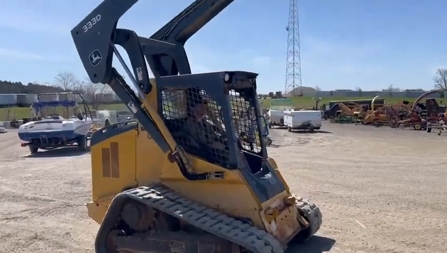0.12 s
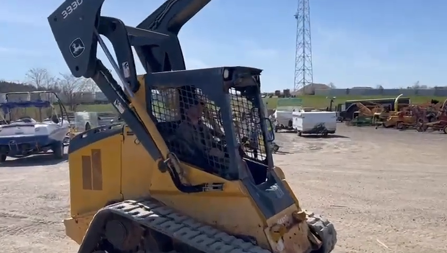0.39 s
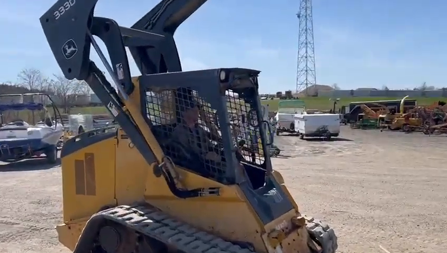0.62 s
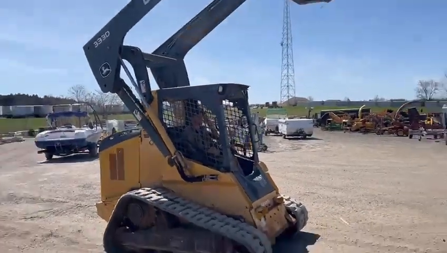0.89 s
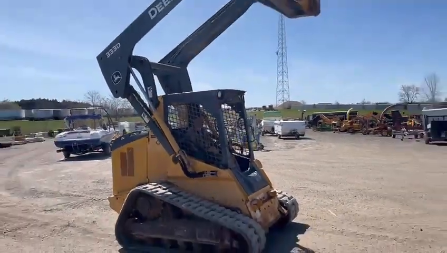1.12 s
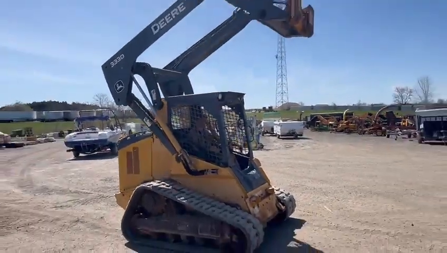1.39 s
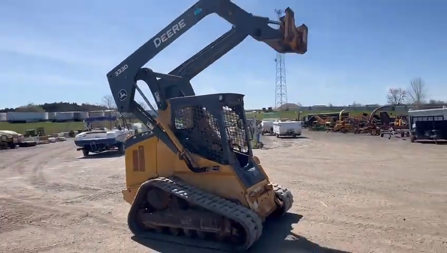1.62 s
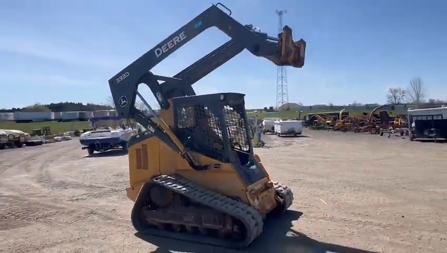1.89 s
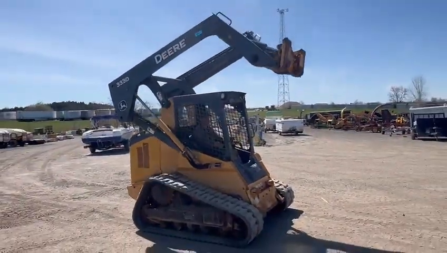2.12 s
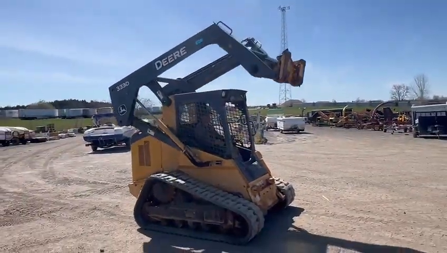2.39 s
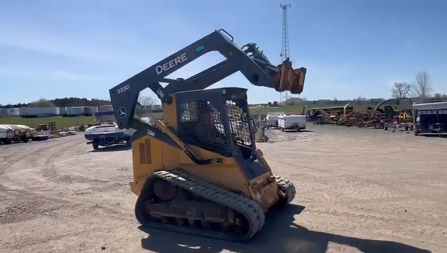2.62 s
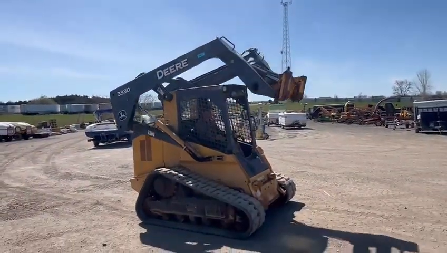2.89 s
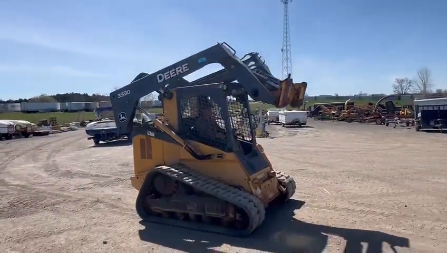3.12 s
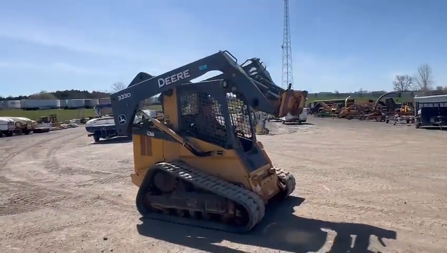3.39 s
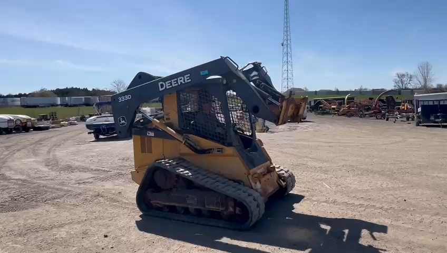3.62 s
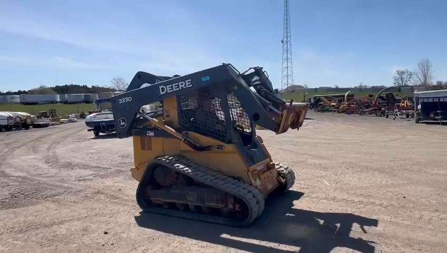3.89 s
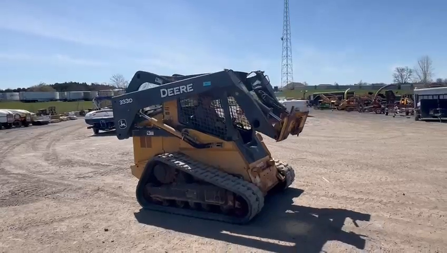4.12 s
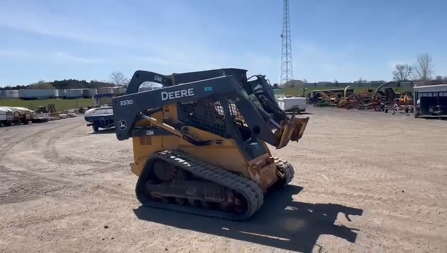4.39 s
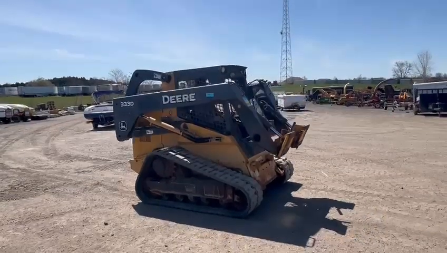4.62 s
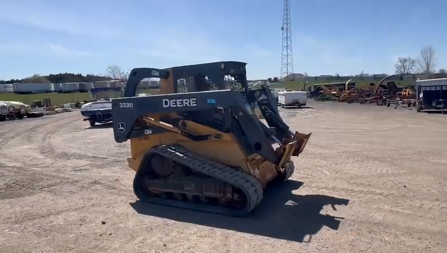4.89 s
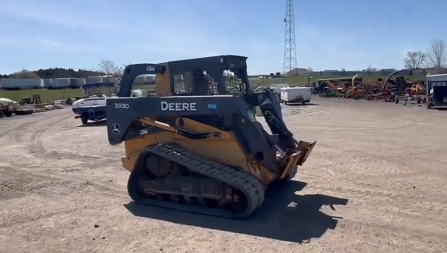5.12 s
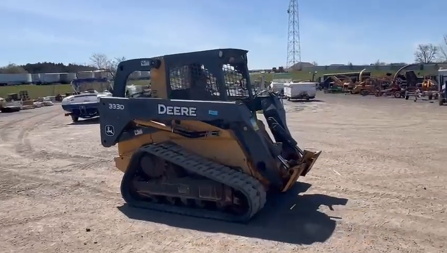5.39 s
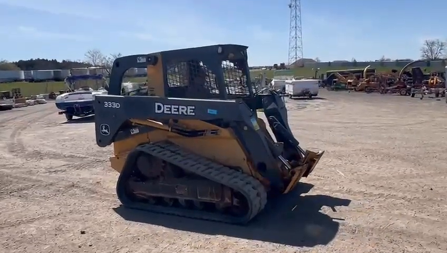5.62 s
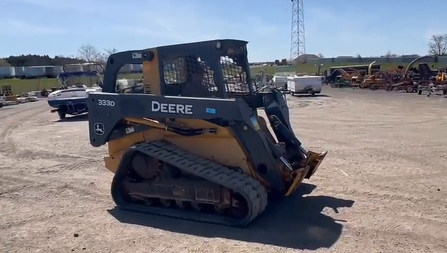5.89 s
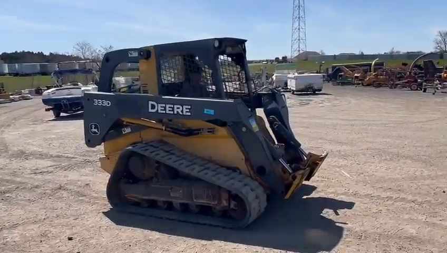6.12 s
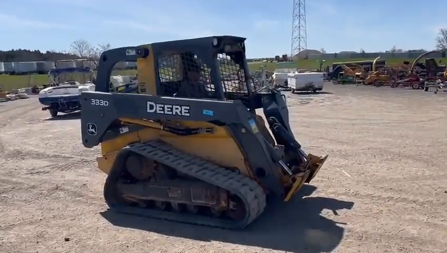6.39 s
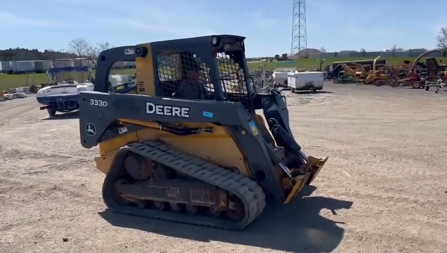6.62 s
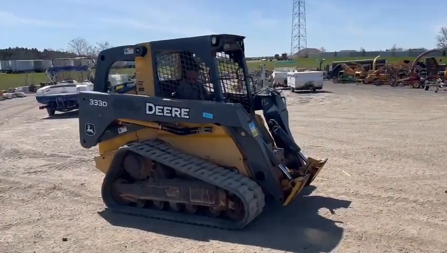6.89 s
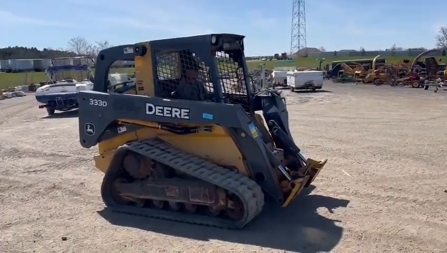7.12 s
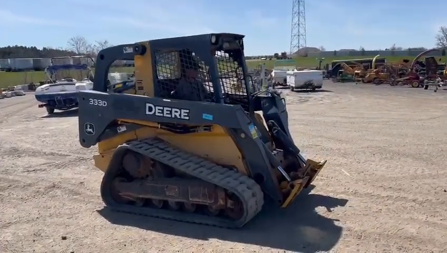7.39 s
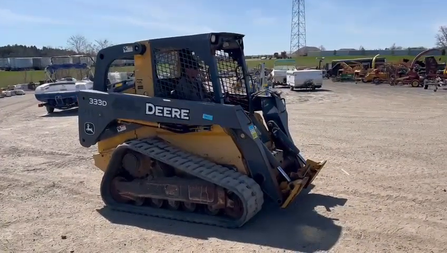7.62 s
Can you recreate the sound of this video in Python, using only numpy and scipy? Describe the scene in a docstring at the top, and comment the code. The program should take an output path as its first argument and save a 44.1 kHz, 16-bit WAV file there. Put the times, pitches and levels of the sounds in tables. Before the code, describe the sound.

Steady low diesel chugging in an open gravel yard, two early bursts of clanking steel, whining hydraulics, and hard wind thumps near the end.

```python
"""Diesel loader lowering its boom

A five-cylinder diesel loader idles in an open gravel yard: five unequal puffs a cycle throb through
exhaust resonances over knocking block modes and filtered-noise roar. The pump and gears whine as sines
on multiples of engine speed, joined by freer whines. Linkage blows clank twice and rattle, ringing
steel modes. Noise gusts and pressure pops buffet two microphones, briefly midway, hard near the end.
"""
import sys
import numpy as np
from scipy import signal
from scipy.fft import rfft, irfft
from scipy.io import wavfile

SR = 44100
rng = np.random.default_rng(int(sys.argv[2]) if len(sys.argv) > 2 else 0)


def transcribe(signal):
    """Save signal, clipped to [-1, 1], as a 16-bit WAV file at the path in sys.argv[1]."""
    frames = np.atleast_2d(signal).T
    limited = np.clip(frames, -1, 1)
    pcm = np.round(limited * 32767).astype(np.int16)
    wavfile.write(sys.argv[1], SR, pcm)


def boost(x):
    """Linear amplitude factor 10**(x/20) for a level x in decibels (scalar or array-like)."""
    u = np.asarray(x, float) / 20
    return 10 ** u


N = 341775
OPPOSITE = np.array([[1], [-1]])   # signs at left and right


def seconds():
    """Time of every sample."""
    return np.arange(N) / SR


def in_time(rows):
    """Columns of a table as straight-line curves, one value a sample."""
    s, *columns = np.transpose(rows)
    return [np.interp(seconds(), s, c) for c in columns]


def glide(x, time_s):
    """One-pole smoothing, started at the first value."""
    r = np.exp(-1 / (time_s * SR))
    return x[0] + signal.lfilter([1 - r], [1, -r], x - x[0])


def stages(rows):
    """Each row holds until the next, with a short glide between them."""
    s, *columns = np.transpose(rows)
    now = np.clip(np.searchsorted(s, seconds()) - 1, 0, None)
    return [glide(c[now], time_s=0.025) for c in columns]


def at_hz(points, hz):
    """A spectrum table read on a log-frequency axis."""
    at, value = np.transpose(points)
    return np.interp(np.log(hz + 1), np.log(at + 1), value)


def rms_one(x):
    """Scales to rms 1."""
    return x / np.sqrt(np.mean(x ** 2) + 1e-20)


def drift(rate_hz, count=1):
    """Slow chance of rms 1: noise through two equal poles, run at every 40th sample."""
    r = np.exp(-80 * np.pi * rate_hz / SR)
    noise = rng.standard_normal((count, N // 40 + 3002))
    slow = signal.lfilter([1], [1, -2 * r, r * r], noise)[:, 3000:]
    return np.array([np.interp(np.arange(N) / 40, np.arange(len(v)), rms_one(v)) for v in slow])


def cut(x, hz, kind, order=2):
    """Butterworth filter."""
    return signal.sosfilt(signal.butter(order, hz, kind, fs=SR, output="sos"), x)


def ring(clicks, hz, t60):
    """A unit click sets a sine of height 1 ringing, down 60 dB after t60 seconds."""
    r, w = boost(-60 / (t60 * SR)), 2 * np.pi * hz / SR
    return signal.lfilter([0, np.sin(w)], [1, -2 * r * np.cos(w), r * r], clicks + 1e-18)


def ring_all(modes, force):
    """One force sets a whole table of modes ringing."""
    return sum(boost(db) * ring(force, hz, t60) for hz, db, t60 in modes)


def swell(clicks, rise_s, fall_s):
    """An envelope of about the clicks' height that rises fast and dies away."""
    up, down = np.exp(-1 / (rise_s * SR)), np.exp(-1 / (fall_s * SR))
    dying = signal.lfilter([1], [1, -down], clicks + 1e-18)
    return signal.lfilter([1 - up], [1, -up], dying)


def struck(modes, force, open_db):
    """A gritty force drives the modes; many small unresolved modes between them pass as noise."""
    grit = rng.standard_normal((2, N))
    edges = [modes[0][0] * .75, min(modes[-1][0] * 1.15, 12000)]
    # a steady unit force would give the resolved modes rms 1
    resolved = ring_all(modes, force * grit[0]) / np.std(ring_all(modes, grit[0]))
    unresolved = cut(force * grit[1], edges, "band") / np.std(cut(grit[1], edges, "band"))
    return resolved + boost(open_db) * unresolved


def knocking(cycle, places):
    """One click for every place in every cycle, a little uneven."""
    clicks = np.zeros(N)
    for place, db in places:
        clicks[1:] += boost(db) * np.diff(np.floor(cycle - place))
    return clicks * boost(.8 * drift(20.0)[0])


def tone(turns, db, waver_db, wander_db=0):
    """A sine of wavering level, fast and slow."""
    level_db = db + waver_db * drift(29.5)[0] + wander_db * drift(0.53)[0]
    return np.sqrt(2) * boost(level_db) * np.sin(2 * np.pi * turns + rng.uniform(0, 2 * np.pi))


def spread(x, lag_s, side_db, low_side_db):
    """An echo off the ground reaches the two sides with opposite sign, more in the treble."""
    late = boost(side_db) * cut(x, 480, "high") + boost(low_side_db) * x
    return x + np.roll(late, round(lag_s * SR)) * OPPOSITE


# Gusts on the microphones. Each row: centre in seconds, width (spread) in seconds, level in dB.
GUSTS = [(3.66, 0.1, -33), (6.55, 0.32, -31), (6.742, 0.067, -28), (6.979, 0.02, -24), (7.1, 0.066, -27)]


def blowing(widen):
    """Each gust is a bell-shaped swell of level, stretched by a factor."""
    t = seconds()
    return sum(boost(db) * np.exp(-.5 * ((t - s) / (widen * width_s)) ** 2) for s, width_s, db in GUSTS)


# Wind pops on the microphones. Each row: centre in seconds, peak in dB, pitch in Hz.
POPS = [(3.585, -16, 258), (3.6865, -9.5, 165), (3.698, -10, 120), (6.269, -12.5, 200), (6.382, -8.5, 138),
        (6.391, -6.5, 142), (6.400, -8.5, 145), (6.4576, -10.5, 230), (6.4664, -8.5, 165),
        (6.557, -12.5, 158), (6.596, -9.5, 280), (6.641, -10, 204), (6.6935, -15, 243), (6.707, -9, 298),
        (6.7206, -8.5, 330), (6.7225, -20.5, 620), (6.731, -12, 148), (6.758, -14, 197),
        (6.762, -14.5, 520), (6.769, -2, 157), (6.802, -12, 230), (6.8215, -0.5, 255), (6.957, -10, 335),
        (6.965, -1.5, 389), (6.9741, -11.5, 750), (6.976, -22, 1500), (6.977, -1.5, 186),
        (6.989, -5.5, 282), (7.004, -15, 590), (7.007, -10, 242), (7.018, -9, 159), (7.074, -14.5, 380),
        (7.081, -6, 165), (7.094, -11, 292), (7.106, -7, 344), (7.109, -22, 690), (7.120, -8.5, 300)]


def pops():
    """Each pop is a short lump of pressure that swings once or twice at its own pitch."""
    out = np.zeros(N)
    spread_swings = .39
    half = SR // 50
    since = np.arange(-half, half) / SR
    for s, db, hz in POPS:
        at = round(s * SR) - half
        lump = np.exp(-.5 * (since * hz / spread_swings) ** 2)
        out[at:at + len(since)] -= boost(db) * lump * np.cos(2 * np.pi * hz * since)
    return out


def wind():
    """Low rumble, lumpy buffeting noise and short brighter pops, partly each side's own."""
    # the rumble has opposite sign at the two ports and swells more widely around each gust
    breeze = boost(-44 + 7.0 * drift(3.0)[0]) + boost(-5) * blowing(widen=2.5)
    rumble = rms_one(cut(rng.standard_normal(N), [35, 130], "band"))
    rumble = breeze * boost(1.2 * drift(6.0)[0]) * rumble * OPPOSITE
    mid, side = rng.standard_normal((2, N))
    air = mid + .3 * side * OPPOSITE
    low = rms_one(cut(air, [75, 230], "band"))
    high = rms_one(cut(cut(air, [330, 900], "band"), 600, "low", order=4))
    push = pops()
    push = push + 0.099 * np.roll(push, round(0.0026 * SR)) * OPPOSITE   # faint late copy
    buffet = blowing(widen=1) * boost(3.0 * drift(25.0)[0])
    return rumble + push + (low + 0.15 * high) * buffet


# Engine roar. Each row: time in seconds, level from 500 to 3500 Hz in dB, treble lift at the top in dB.
ROAR = [(0, -34.5, 5), (1.3, -35.5, 5), (5.2, -37.5, 6.5), (6.2, -37, 6)]
# Roar spectrum. Each row: frequency in Hz, relative density in dB per Hz.
ROAR_COLOUR = [(25, -4), (45, -11.5), (100, -13.5), (160, -18), (300, -28.5), (480, -28), (640, -35.5),
               (950, -32.5), (1650, -40.5), (2150, -40), (2600, -42), (3000, -44), (3600, -48.5),
               (5200, -50.5), (6600, -58), (8300, -54), (9300, -54), (9800, -56), (10300, -34.5)]
# Stereo likeness. Each row: frequency in Hz, share of power common to both sides (0-1, clipped).
SHARED = [(60, 0.97), (250, 1), (600, 0.15), (1500, 0.61), (5000, 0.062), (9000, 0.89)]
# Phase of the common noise. Each row: frequency in Hz, lead of left over right in radians.
LEFT_LEAD = [(500, 0.12), (800, 4.1), (1300, 0.97), (1900, 3.55), (3000, 13.03), (6000, 20.05), (7600, 5.2),
             (9200, 22)]
# Stereo balance. Each row: frequency in Hz, left over right in dB.
LEFT_OVER_RIGHT = [(200, 1), (350, -7), (700, 4), (1300, 1.5), (2500, -1.5), (5000, 1)]
# Beat of the knocks in the roar. Each row: frequency in Hz, depth of the swell (a factor).
KNOCK_DEPTH = [(100, 1.2), (450, 4.3), (1000, 0.64), (2500, 0.75), (8000, 2.1)]


def roar(knocks):
    """Block, fan and valve noise in half-octave bands; knocks swell it, each band flickers."""
    db, bright_db = in_time(ROAR)
    knock = swell(knocks, rise_s=0.006, fall_s=0.011)
    hz = np.fft.rfftfreq(N, 1 / SR)
    common, left, right = rfft(rng.standard_normal((3, N)))
    share = np.clip(at_hz(SHARED, hz), 0, 1)
    turn = np.exp(.5j * at_hz(LEFT_LEAD, hz))
    pair = np.sqrt(share) * common * [turn, 1 / turn] + np.sqrt(1 - share) * np.array([left, right])
    balance_db = np.outer([.5, -.5], at_hz(LEFT_OVER_RIGHT, hz))
    pair = pair * boost(at_hz(ROAR_COLOUR, hz) + balance_db)
    centres = np.geomspace(40, 10000, 17)
    flicker, together = drift(25.0, count=len(centres)), drift(20.0)[0]
    out, step = 0, np.log(centres[1] / centres[0])
    for k, centre in enumerate(centres):
        triangle = np.clip(1 - abs(np.log((hz + 1) / centre)) / step, 0, 1)
        band = irfft(pair * triangle, N)
        height = k / (len(centres) - 1)   # 0 in the lowest band, 1 in the highest
        beat = rms_one(1 + at_hz(KNOCK_DEPTH, centre) * knock)
        level_db = bright_db * height ** 2 + 1.75 * flicker[k] + 0.32 * together
        out = out + band * beat * boost(level_db)
    return boost(db) * out / np.std(cut(out, [500, 3500], "band"))


# A thin high whistle. Each row: start in seconds, pitch in Hz, level in dB, sag in Hz per second,
# fade in dB per second.
WHISTLE = [(1.6, 7620, -54, 93.5, 7)]


def whistle():
    """A thin sine with a trembling pitch that sags as it fades."""
    out = np.zeros(N)
    for start_s, start_hz, db, sag, fade in WHISTLE:
        since = np.clip(seconds() - start_s, 0, None)
        hz = start_hz - sag * since + 18.0 * drift(40.0)[0]
        on = glide(1.0 * (since > 0), time_s=.03)
        out += on * tone(np.cumsum(hz) / SR, db - fade * since, waver_db=3.0)
    return out


# Hoarse whine stages. Each row: start in seconds, pitch in Hz, level in dB.
HOARSE = [(0, 2190, -57), (2.5, 2150, -54.5), (3.8, 2210, -56), (4.6, 2135, -55.5), (6.5, 2140, -50.5)]
# Its three swells a cycle. Each row: place in the cycle (0-1), relative strength in dB.
HOARSE_BEATS = [(0.121, 3), (0.521, 8), (0.861, 8)]


def hoarse_whine(cycle):
    """A whine from the engine bay: a sine made hoarse by pitch jitter, beating with the cycle."""
    hz, db = stages(HOARSE)
    beats = rms_one(.15 + swell(knocking(cycle, HOARSE_BEATS), rise_s=.004, fall_s=.012))
    jittered_hz = hz + 18 * drift(40.0)[0]
    return beats * tone(np.cumsum(jittered_hz) / SR, db, waver_db=2.5)


# Squeaks in the jolts. Each row: start in seconds, length in seconds, pitch in Hz, pitch spread in Hz,
# level in dB.
SQUEAKS = [(.585, .27, 7170, 300, -52), (1.322, .045, 3620, 170, -47)]


def squeaks():
    """Thin sines whose pitch flutters very fast."""
    out, t = np.zeros(N), seconds()
    for start_s, length_s, hz, spread_hz, db in SQUEAKS:
        on = glide(1.0 * (t > start_s) * (t < start_s + length_s), time_s=.015)
        out += on * tone(np.cumsum(hz + spread_hz * drift(300.0)[0]) / SR, db, waver_db=4.5)
    return out


def falling_whine():
    """A sine swells in at 7.42 s, holds its pitch, then sinks."""
    start_s, start_hz, sinks_s, sag_hz_per_s = 7.42, 795, 7.5, 170
    t = seconds()
    hz = start_hz - sag_hz_per_s * np.clip(t - sinks_s, 0, None)
    on = glide(1.0 * (t > start_s), time_s=0.05)
    return on * tone(np.cumsum(hz) / SR, -40, waver_db=2.5)


# Geared whines. Each row: multiple of the firing rate, level in dB before the stage gain.
GEARS = [(13.0, -45), (14.42, -43), (17.0, -50), (20.0, -46)]
# Their stage gain, up once the boom has landed. Each row: start in seconds, gain in dB.
GEARS_IN = [(0, -16.5), (5.6, -6.5), (6.7, -10)]


def gears(cycle):
    """Geared parts whine on fixed multiples of the firing rate, five firings a cycle."""
    gain_db = stages(GEARS_IN)[0]
    return sum(tone(5 * k * cycle, db + gain_db, waver_db=2.5) for k, db in GEARS)


# Stages of hydraulic work: driving, stalled against the jolt, picking up, valve opens, pressure settles,
# boom starts down, sinks, slows, lands, pushes against the stops, pressure bleeds off, at rest.
# Each row: start in seconds, then the levels of harmonics 1 to 4 in dB.
PUMP = [(0, -39.5, -29.5, -43, -44), (.47, -50, -48, -58, -62), (.98, -41, -39, -57, -56),
        (1.2, -25, -36, -54, -72), (1.33, -32.5, -35.5, -61, -49), (2.0, -38, -34.5, -56, -47),
        (2.38, -32, -34.5, -55.5, -50.5), (4.3, -32.5, -39, -62.5, -47), (5.33, -27, -45, -51.5, -55),
        (5.56, -37, -48, -48, -41.5), (6.45, -31.5, -61, -48, -49), (6.8, -26.5, -47, -44, -53.5)]


def pump(cycle):
    """The pump makes four strokes a firing, 20 a cycle, and sounds four harmonics of them."""
    levels = enumerate(stages(PUMP), 1)
    return sum(tone(20 * k * cycle, db, waver_db=.9, wander_db=.6) for k, db in levels)


def hydraulics(cycle):
    """Pump and gear tones follow engine speed; the other whines keep their own pitch."""
    geared = pump(cycle) + gears(cycle)
    return geared + falling_whine() + squeaks() + hoarse_whine(cycle) + whistle()


# Each jolt shakes loose parts. Each row: start in seconds, length of the shaking in seconds,
# boom force in dB, clatter force in dB.
RATTLE = [(0.404, 0.076, -17, -28.5), (0.482, 0.028, -16.5, -31), (1.311, 0.022, -19, -34),
          (1.404, 0.027, -21.5, -37)]
# Fade after the shaking. One value a jolt, in dB per second.
SETTLE_DB_PER_S = [150, 14, 90, 95]


def shaking():
    """Boom and clatter force of the loose parts: on at a jolt, held, then dropping and fading."""
    out = np.zeros((2, N))
    for (start_s, length_s, *db), fade in zip(RATTLE, SETTLE_DB_PER_S):
        after = seconds() - start_s - length_s
        settle_db = -(7 + fade * after) * (after > 0)   # a 7 dB drop, then the fade
        shape = (seconds() > start_s) * boost(settle_db)
        out += np.outer(boost(np.array(db)), glide(shape, time_s=.015))
    return out


# Blows in the linkage. Each row: time in seconds, strength in dB, boom in dB against the strength,
# ring in dB against the strength, frequency in Hz near which the steel rings out.
BLOWS = [(0.394, -19, 10, -5.5, 2770), (0.414, -27.5, 16, -5.5, 870), (0.431, -7.5, -36, -5, 2950),
         (0.446, -18.5, -20, -16, 3200), (0.460, -22, 19, -10, 1060), (0.489, -24.5, 3.5, 10.5, 855),
         (0.502, -33, 14, 3, 1950), (0.513, -26, 23, -3, 840), (0.572, -21, 4.5, -47, 2950),
         (0.622, -38.5, 16, -27, 1000), (0.638, -31.5, 23, -23, 700), (0.677, -30.5, 18, -8.5, 2600),
         (0.743, -31.5, 7, -24, 700), (0.769, -32.5, 3, -1.5, 2050), (0.86, -28.5, 6, -10, 2050),
         (1.313, -29.5, -4, -4, 825), (1.376, -17, -7, -34, 1040), (1.376, -15.5, -15, -31, 2370),
         (1.39, -17, 4, -39, 2900), (1.406, -23, 2, -21, 2110), (1.415, -21, -2, -12.5, 3200),
         (1.4272, -22.5, 21, -11, 1020), (1.448, -20, -7, -7.5, 1080), (1.464, -26, -1, -28, 1240)]
# Low modes of the steel arms. Each row: frequency in Hz, relative level in dB, t60 in seconds.
BOOM_MODES = [(199, 2, 0.07), (243, 7, .09), (288, 7, 0.08), (313, 7, 0.1), (402, 2, 0.08),
              (518, -6, 0.058)]
# Middle modes. Each row: frequency in Hz, relative level in dB, t60 in seconds.
CLATTER_MODES = [(700, -3, 0.076), (850, 12.5, 0.07), (996, 12.5, 0.075), (1090, 13.5, 0.053),
                 (1272, 9.5, 0.041), (2095, 3.5, 0.086), (2370, -1.5, 0.13), (2660, -2.5, 0.079),
                 (2950, -1, 0.04), (3200, -6.5, 0.11)]
# High modes. Each row: frequency in Hz, relative level in dB, t60 in seconds.
RING_MODES = [(3600, -3, 0.012), (4200, -3, 0.013), (5040, 0, 0.02), (7670, 3, 0.01), (8980, -1, 0.012),
              (10600, 6, .012)]


def linkage():
    """Blows grind for some milliseconds and a dense rattle follows; both ring the steel arms."""
    s, peak_db, boom_db, ring_db, near_hz = np.transpose(BLOWS)
    boom, clatter, high = np.zeros((3, N))
    at = np.round(s * SR).astype(int)
    boom[at] = boost(peak_db + boom_db)
    clatter[at] = boost(peak_db)
    high[at] = boost(peak_db + ring_db)

    low, bright = shaking()
    loose = rng.random(N) < 600 / SR   # about 600 hits a second
    loose = loose * boost(2.6 * rng.exponential(1, N).clip(0, 4))
    loose = rms_one(swell(loose, rise_s=.001, fall_s=.005))
    rattle = bright * loose

    boom_grind = 0.22 * swell(boom, rise_s=0.00072, fall_s=0.012)
    out = struck(BOOM_MODES, boom_grind + low * loose, open_db=-7.5)
    shorter = [(hz, db, t60 * 0.75) for hz, db, t60 in BOOM_MODES]
    out += 0.16 * cut(ring_all(shorter, boom), [120, 700], "band")   # first contact
    clatter_grind = 0.22 * swell(clatter, rise_s=0.002, fall_s=0.01)
    out += struck(CLATTER_MODES, clatter_grind + rattle, open_db=-3.5)

    # steel contact at the start of each blow wakes the modes near its pitch
    for hz, db, t60 in CLATTER_MODES:
        hits = np.zeros(N)
        nearness = np.exp(-.5 * (np.log2(hz / near_hz) / .16) ** 2)   # spread .16 octave
        hits[at] = boost(peak_db + db - 7) * nearness
        crack = swell(hits, rise_s=.0015, fall_s=t60 * .4 / np.log(1000))
        out += crack * np.sin(2 * np.pi * hz * seconds())

    out += boost(-21) * ring_all(RING_MODES, high)
    ring_grind = 0.35 * swell(high, rise_s=0.0067, fall_s=0.0065)
    return out + struck(RING_MODES, ring_grind + 0.27 * rattle, open_db=-1.0)


# Knocks in the block. Each row: place in the cycle (0-1), strength in dB.
KNOCKS = [(0.99, -4), (0.133, -10.5), (0.228, -13), (0.338, -6), (0.591, -9), (0.7, -10), (0.828, -10)]


def block_knocks(cycle):
    """Clicks at the same places in every cycle, a little uneven in strength."""
    return knocking(cycle, KNOCKS)


# Block resonances. Each row: frequency in Hz, level in dB, t60 in seconds.
BLOCK_MODES = [(165, -24.5, 0.057), (289.5, -32.5, 0.041), (352, -26, 0.063), (417.7, -26, 0.056),
               (520, -41.5, 0.029)]


def block(knocks):
    """The knocks ring the modes of the engine block."""
    return cut(ring_all(BLOCK_MODES, knocks), [110, 800], "band")


# Engine speed and exhaust note. Each row: time in seconds, firings per second, firing tone in dB.
ENGINE = [(0, 59.2, -12.8), (.33, 59.1, -12.6), (.5, 56.4, -13.5), (.62, 52.8, -15), (.75, 51.4, -15),
          (.87, 55.2, -12.8), (1, 60.2, -12.3), (1.16, 61.5, -12.1), (1.42, 58.9, -14.8), (1.75, 60, -14.2),
          (2.2, 59.15, -15.4), (2.95, 58.33, -15.4), (5.28, 58.23, -15.2), (5.72, 60.15, -12.7),
          (6.05, 60.6, -12.4), (6.65, 60.3, -12.8), (7, 59.9, -15.5), (7.35, 59.75, -13.8)]


def crank():
    """Firing rate, running count of engine cycles (five firings each) and level of the firing tone."""
    rate, firing_db = in_time(ENGINE)
    cycle = 0.26 + np.cumsum(rate / 5) / SR
    return rate, cycle, firing_db


# Cylinders in firing order. Each row: puff strength (a factor), lag in cycles.
CYLINDERS = [(.67, -.011), (1.057, .012), (1.084, .009), (.942, -.005), (1.111, -.025)]
# Exhaust resonances. Each row: frequency in Hz, width in Hz, signed weight.
EXHAUST = [(56.2, 6.9, .076), (93.4, 4.1, -.164), (130.3, 3.0, -.015)]


def exhaust(rate, cycle, firing_db):
    """Five unequal puffs a cycle through the pipe resonances, summed as multiples of the cycle rate."""
    idle_cycle_hz, puff_cut_hz, outlet_cut_hz = 11.7, 150, 30
    uneven_db = -26 + 1.0 * (59 - rate)   # uneven tones grow as load drags the firing rate down
    strength, lag = np.transpose(CYLINDERS)
    order = np.arange(3, 20)
    hz = order * idle_cycle_hz
    puff_turns = np.outer(order, np.arange(5) / 5 + lag)
    puffs = (strength * np.exp(-2j * np.pi * puff_turns)).sum(axis=1)
    pipe = sum(g * 1j * hz * w / (f * f - hz * hz + 1j * hz * w) for f, w, g in EXHAUST)
    pipe = pipe * (1j * hz / (outlet_cut_hz + 1j * hz)) ** 2 / (1 + 1j * hz / puff_cut_hz)
    weight = puffs * pipe
    waver = boost(.8 * drift(4.0, count=len(order)))   # no two cycles burn alike
    phase = 2 * np.pi * np.outer(order, cycle) + np.angle(weight)[:, None]
    tones = np.abs(weight)[:, None] * np.cos(phase)
    firing = order % 5 == 0
    steady = tones[firing].sum(axis=0) / abs(weight[order == 5]) * boost(.4 * drift(6.0)[0])
    uneven = (tones * waver)[~firing].sum(axis=0) / abs(weight[order == 8])
    return np.sqrt(2) * (boost(firing_db) * steady + boost(uneven_db) * uneven)


def scene():
    """Wind, roar, hydraulics, linkage and engine on one crank."""
    rate, cycle, firing_db = crank()
    knocks = block_knocks(cycle)
    whines = spread(hydraulics(cycle), lag_s=0.00079, side_db=-21.5, low_side_db=-39.0)
    arms = spread(linkage(), lag_s=0.00039, side_db=-19, low_side_db=-23.5)
    engine = exhaust(rate, cycle, firing_db) + block(knocks)
    engine = spread(engine, lag_s=.004, side_db=-12, low_side_db=-40)
    return wind() + roar(knocks) + whines + arms + engine


def band_limit(x):
    """A steep low-pass at the top of the band."""
    return signal.sosfilt(signal.butter(12, 11570, fs=SR, output="sos"), x)


def record(dry):
    """The microphones round the peaks and lose the top, at least 22 dB down from 9800 Hz."""
    rounded = 1.095 * np.tanh(dry / 1.202)
    top_cut = signal.cheby2(10, 22, 9800, fs=SR, output="sos")
    narrow = signal.sosfilt(top_cut, rounded)
    return band_limit(narrow)


dry = scene()
out = record(dry)
transcribe(out)
```